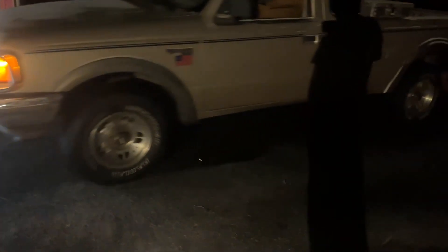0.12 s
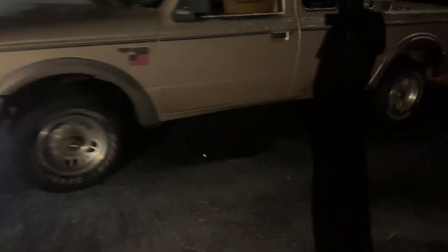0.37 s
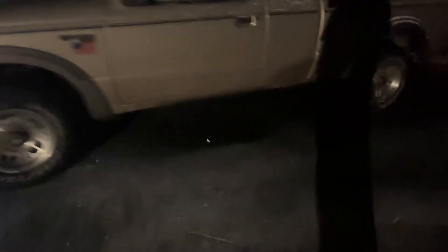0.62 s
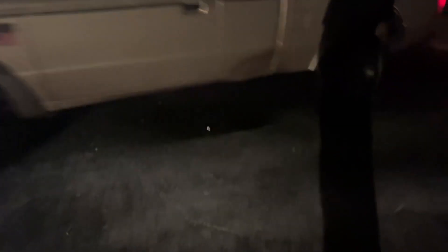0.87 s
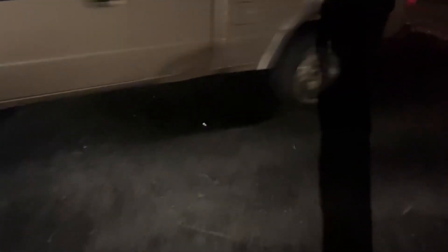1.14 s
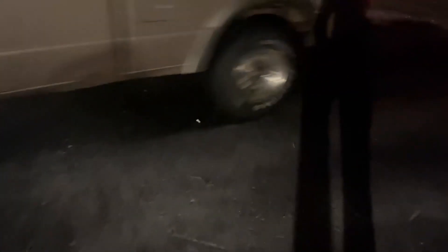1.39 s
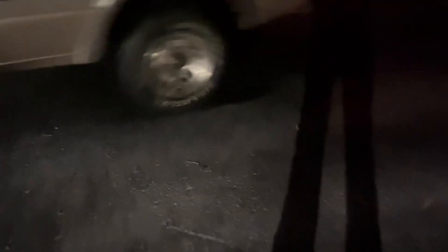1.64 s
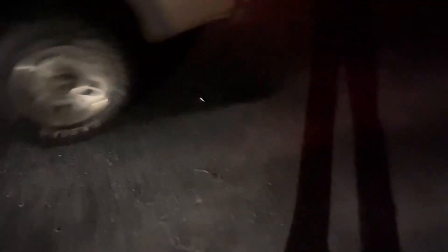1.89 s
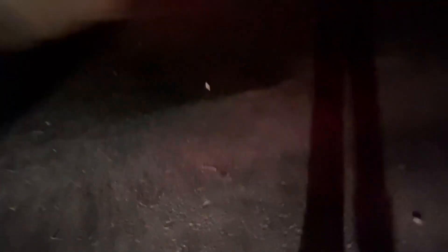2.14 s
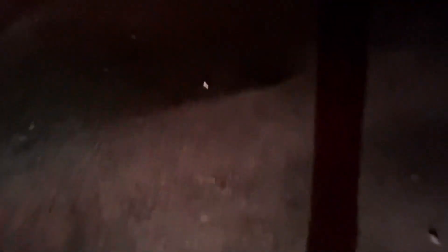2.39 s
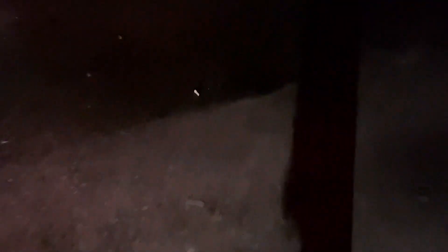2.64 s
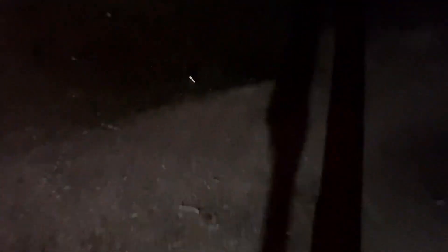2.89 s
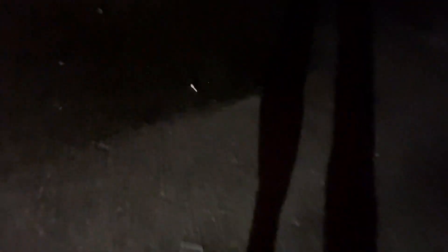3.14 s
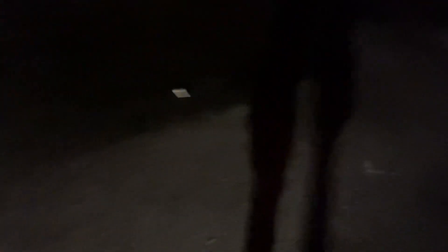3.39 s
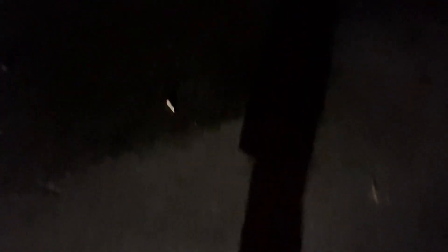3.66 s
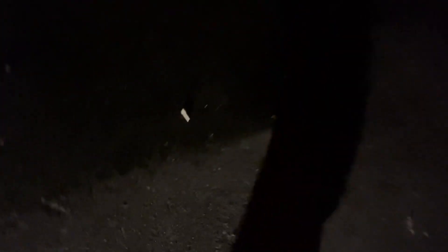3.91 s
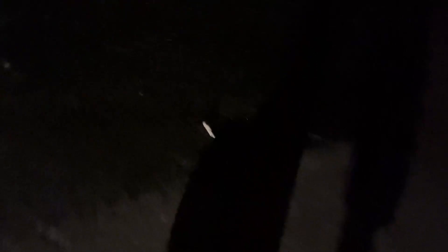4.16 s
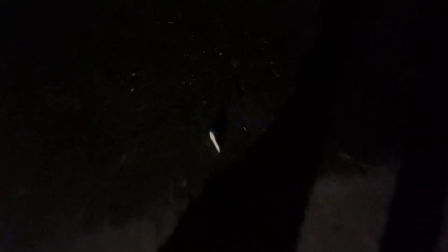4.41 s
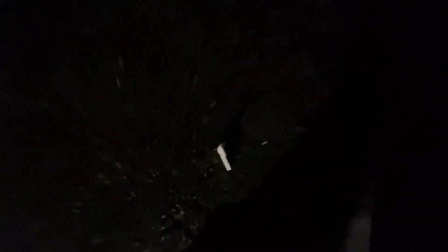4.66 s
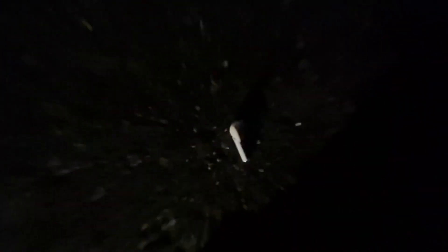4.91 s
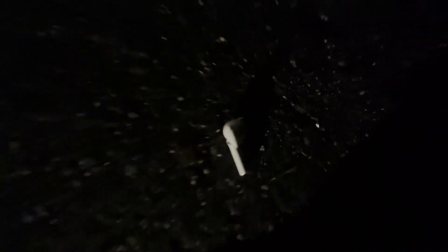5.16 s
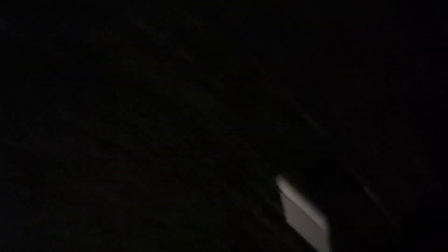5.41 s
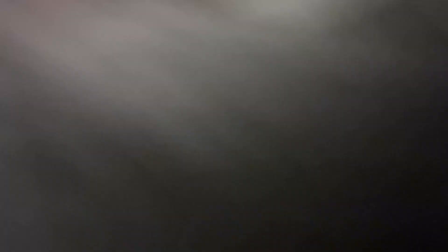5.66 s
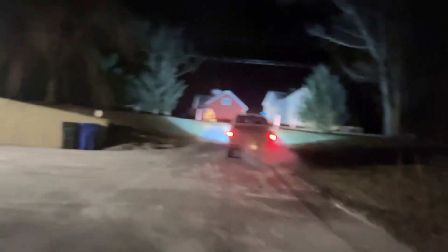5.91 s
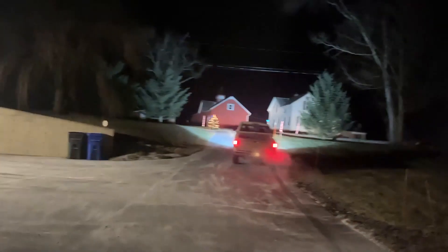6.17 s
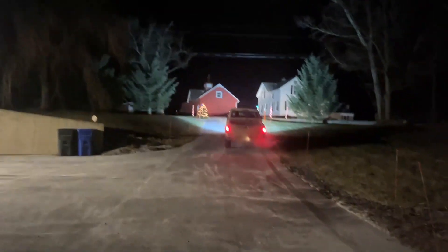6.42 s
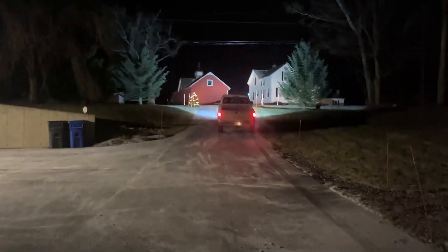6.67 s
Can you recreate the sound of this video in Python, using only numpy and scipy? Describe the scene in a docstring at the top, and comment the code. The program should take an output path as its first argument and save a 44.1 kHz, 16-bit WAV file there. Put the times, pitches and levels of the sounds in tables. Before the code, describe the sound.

Outdoors at night, a pickup rolls past a hand-held phone, its deep exhaust beating steadily over rumble while bumps knock and ring loose sheet metal. It revs up sharply with a raspy roar, drops, then revs again as it drives off. Grit crunches under a shoe. Wind gusts thud against the microphone, strongest during the second rev, then the engine falls away to a faint low hum over thin tyre hiss.

```python
"""A pickup with a loud exhaust rolls past a hand-held phone at night, its beating shaft orders over rumble;
bumps ring loose sheet metal. It revs, then revs again as it drives off up a street in a roar of filtered
noise, while grit crunches under a shoe. From the first rev's end, gusts of lumpy noise and damped pressure
kicks buffet the two microphone ports. Tyre hiss and night air lie beneath."""
import sys
import numpy as np
from scipy import signal
from scipy.fft import rfft, irfft, next_fast_len
from scipy.io import wavfile
from scipy.ndimage import uniform_filter1d

SR = 44100
rng = np.random.default_rng(int(sys.argv[2]) if len(sys.argv) > 2 else 0)


def master_out(mix):
    """Clip the mix to full scale and print it as 16-bit PCM to the path in sys.argv[1]."""
    frames = np.transpose(np.atleast_2d(mix))
    ceiling = np.clip(frames, -1, 1)
    pcm = np.round(ceiling * 32767).astype(np.int16)
    wavfile.write(sys.argv[1], SR, pcm)


def invert_db(level):
    """Linear amplitude ratio for a level in decibels (20 dB per decade), elementwise."""
    return 10 ** (np.asarray(level, dtype=float) / 20)


N = 299615

# Levels in the tables are ahead of the trims in the functions; density_db is dB per Hz, a relative colour.
# Exhaust rolling past and first rev: start_s, shaft_turns_per_s, order_2_db, order_3_db, order_4_db, order_6_db
ENGINE_NEAR = [(0.06, 33.5, -18, -16, -19, -30), (0.4, 33.9, -17, -18, -19, -30),
               (0.97, 34.5, -17, -16, -16, -27), (1.45, 36.2, -16, -13, -17, -23),
               (2.31, 37.1, -13, -21, -23, -28), (2.67, 37.2, -16, -14, -23, -39),
               (2.87, 37.1, -19, -14, -26, -27), (3.04, 37.1, -22, -14, -23, -27),
               (3.35, 40.9, -23, -20, -23, -32), (3.56, 47.0, -17, -25, -27, -35),
               (3.67, 52.1, -13, -34, -33, -33), (3.72, 54.8, -14, -35, -43, -44),
               (3.78, 57.9, -14, -26, -37, -42), (3.91, 60.0, -17, -25, -28, -50),
               (4.06, 62.4, -17, -24, -29, -43), (4.13, 62.8, -20, -38, -37, -48),
               (4.22, 55.6, -31, -38, -38, -66), (4.26, 53.2, -30, -38, -36, -48)]
# Eddies slapping the ports: start_s, level_db, t60_s
EDDY_HITS = [(4.299, -32, 0.12), (4.647, -7.5, 0.099), (4.786, -11, 0.07), (5.041, -18, 0.047),
             (5.251, -21, 0.054), (5.321, -1, 0.13), (5.372, -1.5, 0.098), (5.415, -6, 0.045),
             (5.482, -5.5, 0.063), (5.557, -0.5, 0.038), (5.694, -14, 0.08), (5.725, -7, 0.17),
             (6.087, -27, 0.032), (6.119, -16, 0.04), (6.764, -24, 0.2)]


def exhaust_near():
    """Four strong orders trade places as the truck rolls by; the weak ones pass the muffler."""
    # One level shared by the weak orders: start_s, level_db
    faint_level = [(0, -5.5), (1.5, -2), (2.3, -12), (3.1, -16), (3.6, -11), (4.1, -6.5), (4.26, -18)]
    # Weak shaft orders: order, level_db
    faint_orders = [(1, -44), (5, -28), (7, -23.5), (8, -36), (9, -26.5)]
    # Muffler response: pitch_hz, gain_db
    muffler = [(35, -8.5), (62, 21), (170, -1), (250, 1.5), (320, -8), (400, -13), (550, -27)]
    orders = [(k, level(ENGINE_NEAR, column)) for column, k in enumerate((2, 3, 4, 6), 2)]
    for k, db in faint_orders:
        k = round(k)
        muffled_db = db + read(muffler, k * curve(ENGINE_NEAR, 1))
        orders.append((k, level(faint_level) * invert_db(muffled_db)))
    return invert_db(.4) * exhaust(ENGINE_NEAR, orders, unsteady=.002, uneven_db=.4)


def exhaust_away():
    """Only the low orders carry from afar, and they waver in the moving air."""
    # Engine driving off: start_s, shaft_turns_per_s, order_2_db
    engine_away = [(4.26, 49.2, -31), (4.36, 46.4, -21.5), (4.54, 44.3, -21.5), (4.72, 55.6, -18),
                   (4.9, 59.9, -18), (5.32, 62.4, -22), (5.47, 57.6, -32), (5.5, 57.1, -15),
                   (5.63, 60.2, -23), (5.68, 58.9, -14.5), (5.75, 55.6, -58), (5.92, 34.0, -44),
                   (6.01, 33.1, -33.5), (6.17, 36.3, -21.5), (6.25, 37.8, -27), (6.43, 41.1, -28),
                   (6.72, 43.7, -18.5), (6.78, 44.1, -20.5)]
    # Orders 3 and 4 against order 2: pitch_hz, gain_db
    upper_gain = [(90, 2), (110, 1), (135, -8), (180, -10), (250, -12)]
    second = level(engine_away, 2)
    orders = [(2, second)]
    for k in (3, 4):
        orders.append((k, second * invert_db(read(upper_gain, k * curve(engine_away, 1)))))
    return exhaust(engine_away, orders, unsteady=.008, uneven_db=2.2)


def exhaust(rows, orders, unsteady, uneven_db):
    """Shaft orders locked into one beat; each wavers a little, and every second turn fires harder."""
    # Shape of one exhaust beat: phase_rad of orders 1 to 9
    beat_phase = [0, 0, .1, -1.1, 1.1, -.5, 1.9, .9, 3]
    turns_per_s = curve(rows, 1) * (1 + unsteady * wander(12))
    angle = 2 * np.pi * np.cumsum(turns_per_s) / SR
    out = np.zeros((2, N))  # the second row, the unlike part between the ports, stays silent
    for k, gain in orders:
        gain = np.sqrt(2) * gain * invert_db(uneven_db * wander(10))  # rms to peak
        alternate = 1 + 0.083 * np.cos(angle / 2 + k)
        out[0] += gain * alternate * np.cos(k * angle + beat_phase[k - 1])
    return out


def rumble():
    """Low coloured noise under the exhaust orders."""
    # Swell of the rumble: start_s, level_db
    rumble_level = [(0, -37), (1.0, -42.5), (1.6, -38), (2.9, -40), (3.4, -46.5), (3.7, -42), (4.05, -39.5),
                    (4.3, -48)]
    # Rumble spectrum: pitch_hz, density_db
    rumble_colour = [(20, -19.5), (45, 17), (90, 16.5), (160, 21.5), (260, 16.5), (330, 6.5), (400, 5),
                     (700, -4), (1100, -12), (1800, -32.5), (4000, -92)]
    return noise(rumble_colour, patchy_db=-2.5) * level(rumble_level) * invert_db(12.5)


def clatter():
    """Engine-bay ticks and bumps ring loose panels over a hiss that pulses with the firing."""
    # Clatter, alongside and then driving off: start_s, level_db, lower_part_db (above level_db)
    clatter_level = [(0, -54, -2.5), (0.28, -54, 4.5), (0.7, -48, 2.5), (1.0, -46.5, 3.5), (1.2, -39.5, -3),
                     (1.5, -42.5, 0.5), (1.75, -42.5, -2), (1.95, -44, -3.5), (2.2, -47, -3.5),
                     (2.5, -49.5, -3), (2.83, -62, 0), (3.17, -63.5, -1.5), (3.6, -75.5, -6.5),
                     (4.6, -68, -4), (4.85, -55.5, -9.5), (5.55, -59.5, -9), (5.75, -75, -6),
                     (6.05, -73, 1.5), (6.2, -66, 7.5), (6.79, -75, 4)]
    # Spectrum of the upper hiss: pitch_hz, density_db
    upper_colour = [(1300, -12), (1700, -3.5), (2200, -15), (3100, -6.5), (3900, -9), (5000, -12.5),
                    (7000, -19), (9000, -21.5), (12000, -27), (14500, -33.5), (15500, -61.5)]
    # Spectrum of the lower hiss: pitch_hz, density_db
    lower_colour = [(400, -11), (600, -5), (1000, -4.5), (1200, -14), (1500, 1), (1900, -34.5),
                    (3000, -61.5)]
    # Bumps: start_s, panel_knock_db, rattle_after_db
    bumps = [(0.303, -51, -47), (0.608, -41, -60.5), (0.8406, -43.5, -58), (1.248, -25, -50),
             (1.3411, -20.5, -43.5), (1.4815, -28, -38.5), (1.65, -25.5, -49), (1.8976, -25.5, -37.5),
             (2.05, -35, -57.5), (2.114, -43, -54), (2.204, -22, -50), (2.3938, -22.5, -66.5),
             (2.63, -36, -65.5), (2.971, -45.5, -49)]
    rattle_t60_s, turned_s, far_hiss_db = 0.38, 4.0, -14  # hiss hardly carries once the truck has turned away
    firing = 1 + .25 * np.cos(2 * np.pi * np.cumsum(2 * curve(ENGINE_NEAR, 1)) / SR)  # twice a turn
    high = level(clatter_level) + bursts([(s, db, rattle_t60_s) for s, _, db in bumps], rise=0.0027)
    low = level(clatter_level) * invert_db(curve(clatter_level, 2))
    hiss = invert_db(-2) * high * noise(upper_colour, patchy_db=1.2)
    hiss += invert_db(3.0) * low * noise(lower_colour, patchy_db=4)
    hiss *= firing * np.where(np.arange(N) / SR < turned_s, 1, invert_db(far_hiss_db))
    knocks = np.zeros(N)
    for s, db, _ in bumps:
        knocks[round(s * SR)] = invert_db(db - 26.0)
    return hiss + panel_rings(low, high, firing, knocks)


def panel_rings(low, high, firing, knocks):
    """Random ticks, denser with the firing, and single knocks excite damped sheet-metal modes."""
    # Loose sheet metal: pitch_hz, width_hz (before narrowing), level_db
    panels = [(549, 15, 1), (974, 63, 7), (1210, 27, -13), (1402, 38, 17), (1860, 46, -6.5),
              (2079, 20, -1.5), (2242, 35, 0), (2382, 47, -5.5), (2630, 28, -5.5), (2898, 8.6, -9),
              (3748, 35, -0.5), (3900, 22, -8), (4130, 54, -0.5), (4430, 240, 5.5)]
    t = np.arange(3000) / SR
    rings = np.zeros((2, N))
    shaking = wander(18)  # shared by all panels
    for hz, width, db in panels:
        draw = rng.random((2, N)) * SR / 1500
        ticks = np.where(draw < firing, np.cos(np.pi * draw / firing), 0)
        ticks *= invert_db(2.0 * wander(2.3) + 2.54 * shaking)  # clumps
        ticks = invert_db(-9.5) * ticks * (low if hz < 1600 else high) + knocks
        decay = np.exp(-np.pi * .9 * width * t)  # .9 narrows the mode
        ring = invert_db(db) * decay * np.sin(2 * np.pi * hz * t)
        rings += signal.oaconvolve(ticks, ring[None], axes=1)[:, :N]
    return rings


def roar():
    """Intake and tyre noise swells with the throttle, its treble less so; four noise resonances sing."""
    # Roar under throttle: start_s, level_db, brightness_db
    throttle = [(3.2, -73, -5), (3.5, -58, -2.5), (3.6, -53, -2), (3.65, -44, -0.5), (3.78, -39.5, 0.5),
                (4.08, -37, 6), (4.19, -39.5, 2), (4.28, -45.5, -2), (4.45, -50.5, -6.5), (4.6, -53.5, -3),
                (4.7, -46, -4.5), (4.8, -43.5, -1.5), (5.33, -44, -5.5), (5.49, -40.5, 2),
                (5.63, -46.5, -2.5), (5.79, -61, -2), (5.95, -73, -1)]
    # Spectrum of the body: pitch_hz, density_db
    body_colour = [(300, -21.5), (500, -7), (800, 3), (1100, 2.5), (1400, 6.5), (1700, -3.5), (2100, -13),
                   (2500, -11.5), (2900, -11), (3300, -11.5), (4200, -25.5), (6000, -72)]
    # Spectrum of the treble: pitch_hz, density_db
    treble_colour = [(2500, -40), (3200, 4.5), (3800, -7.5), (5000, -2), (6000, -12.5), (7500, -5),
                     (9000, -12), (12000, -20.5), (14500, -27), (15500, -57.5)]
    # Intake howl following the revs: start_s, level_db, pitch_hz
    intake = [(3.1, -44, 570), (3.25, -48, 573), (3.45, -44, 672), (3.76, -37, 722), (4.2, -67, 660),
              (4.3, -47, 670)]
    # Faint high whistle under throttle: start_s, level_db, pitch_hz
    whistle = [(3.6, -60.5, 5820), (3.82, -46.5, 6350), (4.13, -47.5, 5700), (4.6, -63.5, 5780),
               (5.0, -60.5, 5900), (5.12, -54, 6130), (5.4, -60.5, 5840), (5.65, -91, 5820)]
    full_db = -45  # roar level at which the shares below make no change
    treble_share, treble_db = 0.79, -16.5  # the treble rises by only a share of the roar's dB
    rasp_share, rasp_db, pipe_hz = 1.5, -47, 1577  # the tailpipe rasp rises by a little more
    rush_hz, rush_width_hz, rush_db = 2200, 1300, -4
    under_db = curve(throttle, 1) - full_db
    bright_db = curve(throttle, 2)  # moves power from the rasp to a broad rush

    body = noise(body_colour, patchy_db=3.0)
    treble = noise(treble_colour, patchy_db=3.0) * invert_db(treble_db + (treble_share - 1) * under_db)
    flicker = invert_db(1.2 * wander(15))
    air = rng.standard_normal((2, N))
    howl = evened(resonate(air, curve(intake, 2), width=290)) * level(intake)
    rasp_gain_db = rasp_db - full_db + (rasp_share - 1) * under_db - bright_db
    rasp = evened(resonate(air, np.full(N, pipe_hz), width=130)) * invert_db(rasp_gain_db)
    rush = evened(resonate(air[::-1], np.full(N, rush_hz), width=rush_width_hz))
    rush *= invert_db(rush_db + bright_db)
    whine = invert_db(-5) * evened(resonate(air, curve(whistle, 2), width=1100)) * level(whistle)
    broad = invert_db(7.5) * flicker * (body + treble)
    return level(throttle) * (broad + rush + invert_db(2.0) * rasp) + invert_db(1.5) * howl + whine


def wind():
    """Eddies make lumpy pressure, nearly alike at both ports; each starts fast and dies slowly."""
    # Rough part of the gusts: start_s, level_db
    rough_level = [(4.15, -52), (4.18, -53), (4.24, -56), (4.33, -29.5), (4.55, -45), (4.64, -26),
                   (5.28, -23.5), (5.39, -24.5), (5.44, -29.5), (5.49, -25), (5.53, -39), (5.56, -22),
                   (5.66, -44), (5.69, -27), (5.75, -31), (5.8, -43.5), (5.88, -34), (5.91, -44),
                   (6.07, -49), (6.09, -37), (6.45, -45.5), (6.51, -35.5), (6.59, -48), (6.79, -29)]
    # Spectrum of the rough part: pitch_hz, density_db
    rough_colour = [(60, -21), (100, 18.5), (180, 4), (260, 5.5), (400, 0), (600, -6), (850, -13),
                    (1200, -27.5), (2000, -41.5), (4000, -100)]
    # Deeper part against the rough part: start_s, gain_db
    deep_gain = [(4.15, 4.5), (4.55, 0.5), (4.7, -15.5), (5.75, -14.5), (6.2, -16), (6.45, -5), (6.79, 5.5)]
    # Spectrum of the deeper part: pitch_hz, density_db
    deep_colour = [(60, -16), (120, 3), (200, 4.5), (300, -3), (450, -20.5), (900, -77.5)]
    # Low thudding: start_s, level_db
    thud_level = [(4.15, -51), (4.18, -31.5), (4.52, -33.5), (4.55, -30), (4.63, -29), (5.23, -24),
                  (5.25, -42), (5.49, -21.5), (5.94, -50), (6.11, -30.5), (6.76, -38.5), (6.79, -28)]
    # Spectrum of the thudding: pitch_hz, density_db
    thud_colour = [(15, -27), (25, -14), (40, 6.5), (60, 6.5), (100, 13), (150, -15.5), (220, -12.5),
                   (400, -55), (1000, -100)]
    # Spectrum of the faint low puffs: pitch_hz, density_db
    breeze_colour = [(20, -10), (45, -10), (80, -4.5), (130, -42.5), (300, -94)]
    breeze_db, fade_db_per_s, swing_db = -32, 7.5, 6  # puffs that die down

    eddies = (rng.random(N) < 140 / SR) * invert_db(0.59 * rng.standard_normal(N))  # about 140 a second
    flutter = evened(1.2 + signal.lfilter([1], [1, -np.exp(-1 / (0.017 * SR))], eddies))
    gusts = invert_db(2.5) * level(rough_level) * flutter + invert_db(-17.5) * bursts(EDDY_HITS, rise=0.0057)
    gusts = signal.oaconvolve(gusts, np.hanning(150) / 75, "same")  # rounds the onsets
    thud = noise(thud_colour, patchy_db=1.5) * invert_db(1.2 * wander(6.7)) * level(thud_level) * invert_db(5.5)
    puffs_db = breeze_db - fade_db_per_s * np.arange(N) / SR + swing_db * wander(4)
    breeze = noise(breeze_colour, patchy_db=-0.5) * invert_db(puffs_db)
    rough = noise(rough_colour, patchy_db=0.5)
    rough += invert_db(curve(deep_gain, 1)) * noise(deep_colour, patchy_db=2.5)
    mid, side = rough * gusts + thud + breeze + slaps()
    side = invert_db(-11) * side
    return np.array([invert_db(3.15) * mid + side, invert_db(1.8) * mid - side])


def slaps():
    """A few damped swings of pressure, falling in pitch, where each eddy lands."""
    start_hz, t60_s, kick_db = 686, .05, -8.5  # each start pitch is spread at random
    rise_s, fall_s = .003, .005
    out, t = np.zeros(N), np.arange(N) / SR
    for (s, db, _), spread in zip(EDDY_HITS, rng.uniform(.8, 1.15, (len(EDDY_HITS), 1))):
        age = np.maximum(t - s, 0)
        # the pitch falls towards a quarter of its start
        turns = start_hz * spread * (.25 * age + .75 * fall_s * (1 - np.exp(-age / fall_s)))
        onset = np.sin(np.pi / 2 * np.minimum(age / rise_s, 1)) ** 2
        out += onset * invert_db(kick_db + db - 60 * age / t60_s) * np.sin(2 * np.pi * turns)
    return out


def scuffs():
    """Grit crunches under a shoe: noise with a sharp start, then a gritty tail."""
    # Crunches: start_s, level_db, t60_s
    crunches = [(3.4842, -38.5, 0.66), (4.6245, -37, 0.37), (6.1793, -49.5, 0.061), (6.354, -60, 0.08),
                (6.557, -48.5, 0.094), (6.678, -46.5, 0.088)]
    # pitch_hz, density_db
    grit_colour = [(1000, -72.5), (1800, -30), (3000, 1.5), (4500, -4.5), (7000, -11), (11000, -19.5),
                   (15000, -30.5)]
    return invert_db(-3) * bursts(crunches, rise=0.00065) * noise(grit_colour, patchy_db=0.5)


def street():
    """Tyre hiss and night air as coloured noise."""
    # Swell of the hiss: start_s, level_db
    street_level = [(0, -45.5), (2, -44.5), (3.3, -49.5), (5.5, -61.5), (5.9, -61), (6.1, -55.5),
                    (6.25, -54.5), (6.45, -55.5), (6.79, -53)]
    # Hiss spectrum: pitch_hz, density_db
    street_colour = [(300, -22.5), (600, -18.5), (1200, 5), (2000, -13), (2900, -8), (3800, -11),
                     (5000, -17.5), (7500, -16.5), (10000, -24), (13000, -31.5), (15300, -56)]
    return noise(street_colour, patchy_db=1.5) * level(street_level)


def noise(colour, patchy_db):
    """Two unrelated noises of one colour, with drifting patches in time and frequency."""
    hz = np.fft.rfftfreq(1024, 1 / SR)
    a, b, c, d, patches = rng.standard_normal((N // 256 + 5, 513, 5)).T
    patches = uniform_filter1d(patches, size=8, axis=0)
    patches = evened(uniform_filter1d(patches, size=10, axis=1))
    z = np.array([a + 1j * b, c + 1j * d]) * invert_db(read(colour, hz)[:, None] + patchy_db * patches)
    return evened(signal.istft(z, nperseg=1024, noverlap=768)[1][:, :N])


def resonate(x, hz, width):
    """Resonance along a pitch curve: shifts it down to zero, smooths twice, and shifts back."""
    turn = np.exp(2j * np.pi * np.cumsum(hz) / SR)
    r = np.exp(-np.pi * width / SR)
    smooth = signal.lfilter([(1 - r) ** 2], [1, -2 * r, r * r], x / turn)
    return 2 * (turn * smooth).real


def bursts(rows, rise):
    """Envelope of events that start within rise seconds and die away."""
    shape, t = np.zeros(N), np.arange(N) / SR
    for s, db, t60 in rows:
        shape += np.clip((t - s) / rise, 0, 1) * invert_db(db - 60 * np.maximum(t - s, 0) / t60)
    return shape


def wander(hz):
    """Slow chance of rms 1: noise low-passed at hz."""
    smoother = signal.butter(2, hz, fs=SR / 64, output="sos")
    coarse = signal.sosfilt(smoother, rng.standard_normal(N // 64 + 2))
    return evened(np.interp(np.arange(N) / 64, np.arange(len(coarse)), coarse))


def level(db_rows, column=1):
    """Gain from a dB column, fading to silence outside the table."""
    t = np.arange(N) / SR
    inside = (t >= db_rows[0][0] - .05) & (t <= db_rows[-1][0] + .05)
    return invert_db(curve(db_rows, column)) * uniform_filter1d(inside * 1., size=1500, mode="nearest")


def curve(rows, column):
    """One column of a table at every sample."""
    rows = np.array(rows)
    return np.interp(np.arange(N) / SR, rows[:, 0], rows[:, column])


def read(points, hz):
    """Reads a spectrum on a log-frequency axis."""
    f, value = np.transpose(points)
    return np.interp(np.log(hz + 1), np.log(f + 1), value)


def evened(x):
    """Scales to rms 1."""
    return x / np.sqrt(np.mean(x ** 2) + 1e-20)


def ports(pair, lead, tilt_db):
    """The right port hears the left one's sound later, tilted, and partly from other paths."""
    # Likeness of the two ports: pitch_hz, likeness (0-1)
    likeness = [(60, 0.96), (300, 0.95), (1200, 0.87), (2000, .88), (3000, 0.8), (4200, .9), (5300, 0.55),
                (8000, 0.92), (8800, 1), (9600, .62), (11200, .99), (13000, 0.84), (13900, .45),
                (14700, 0.76)]
    size = next_fast_len(N + 8192)
    hz = np.fft.rfftfreq(size, 1 / SR)
    first, other = rfft(np.pad(pair, ((0, 0), (2048, size - N - 2048)), "reflect"))
    same = np.clip(read(likeness, hz), 0, 1)
    lag = np.exp(-1j * np.interp(hz, *np.transpose(lead)))
    right = (same * first + np.sqrt(1 - same ** 2) * other) * lag
    half = invert_db(read(tilt_db, hz) / 2)  # each port takes half of the tilt
    return irfft(np.array([first * half, right / half]), size)[:, 2048:2048 + N]


def scene():
    """Near and far truck sounds each reach the right port later, with their own lag and tilt; wind on top."""
    # Lag of the right port, truck near: pitch_hz, lag_rad
    lead_near = [(0, 0), (1400, 3.1), (2000, 5.9), (3200, 8.6), (3600, 12.3), (4700, 14), (5300, 14),
                 (5600, 12.3), (7000, 11), (8000, 9.42), (8800, 9.42), (11200, 6.28), (13000, 6.28),
                 (14600, 3.14)]
    # Lag of the right port, truck away: pitch_hz, lag_rad
    lead_away = [(0, 0), (1200, 3.0), (1700, 4.2), (2000, 6), (3300, 9.4), (5200, 15.7), (6100, 18.8),
                 (6700, 16.5), (8000, 15.71), (8800, 15.71), (11200, 12.57), (13000, 12.57), (14600, 9.42)]
    # Left port over right, truck near: pitch_hz, tilt_db
    tilt_near = [(60, 1.2), (150, 1.5), (400, 1), (600, 5), (1200, 2), (1580, -5), (1850, 6), (2400, 2),
                 (3700, 6), (5000, 5), (6300, -1), (8000, 0)]
    # Left port over right, truck away: pitch_hz, tilt_db
    tilt_away = [(60, -1), (300, 6.5), (900, -1), (1580, -6.5), (1950, 10), (2500, -3), (3800, 3.5),
                 (5000, -1.5), (6200, 1), (8000, 1)]
    near = exhaust_near() + rumble() + clatter()
    away = exhaust_away() + roar() + scuffs() + street()
    return ports(near, lead_near, tilt_near) + ports(away, lead_away, tilt_away) + wind()


def top_cut(x):
    """Nothing passes above the cut-off."""
    return signal.sosfilt(signal.butter(12, 15410, fs=SR, output="sos"), x)


def record(dry):
    """The microphone's bass cut, run forwards and backwards so that it shifts no phase."""
    bass_cut = signal.butter(2, 38, "high", fs=SR, output="sos")
    mix = signal.sosfiltfilt(bass_cut, dry)
    return top_cut(mix)


dry = scene()
out = record(dry)
master_out(out)
```